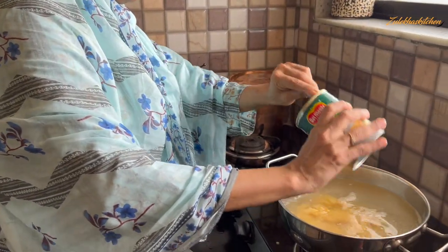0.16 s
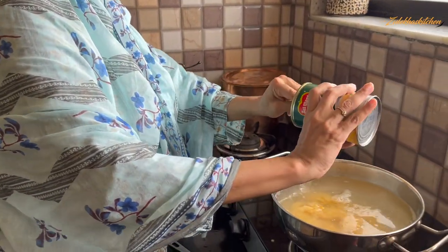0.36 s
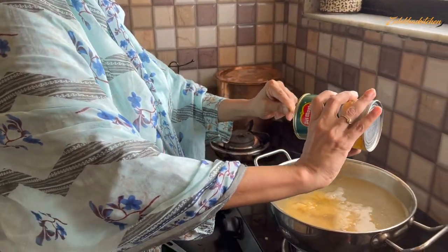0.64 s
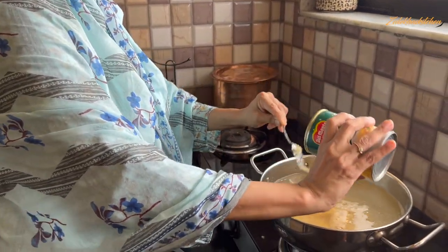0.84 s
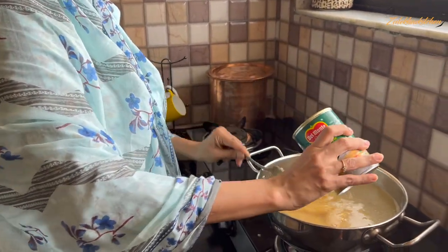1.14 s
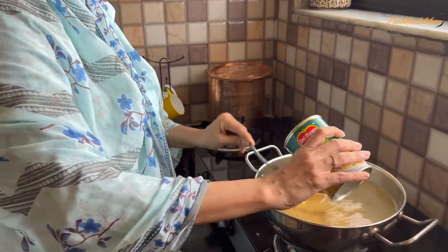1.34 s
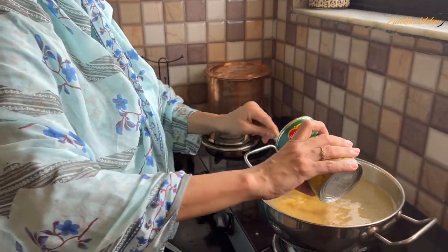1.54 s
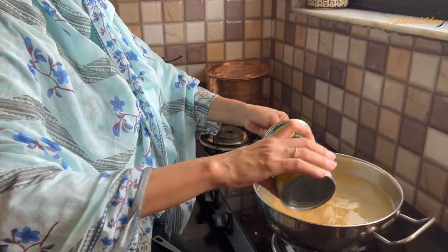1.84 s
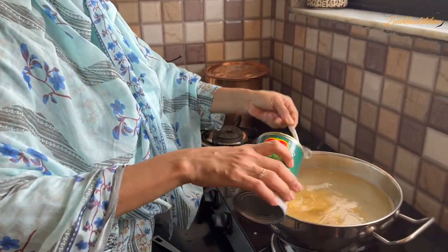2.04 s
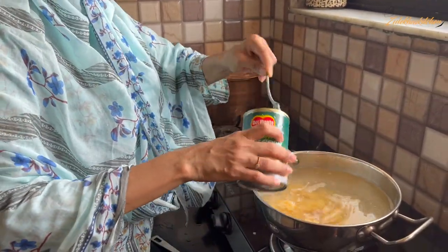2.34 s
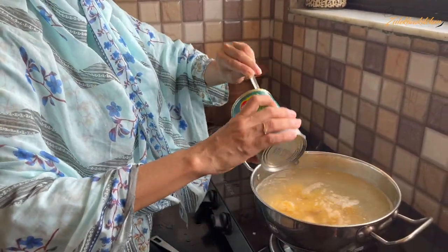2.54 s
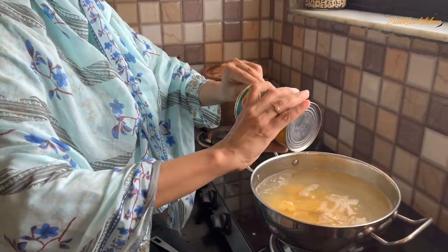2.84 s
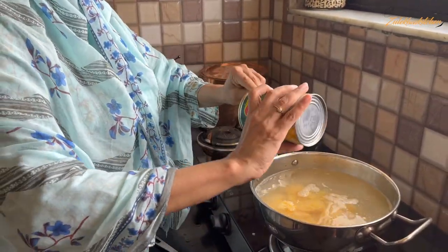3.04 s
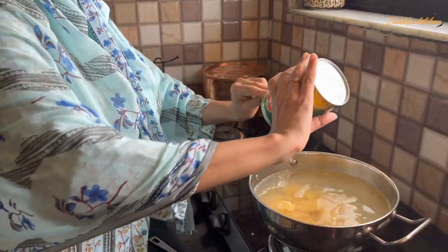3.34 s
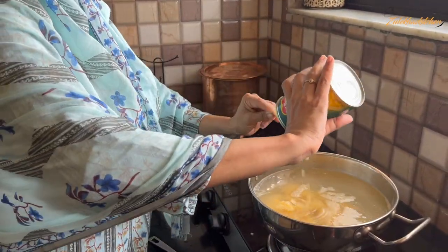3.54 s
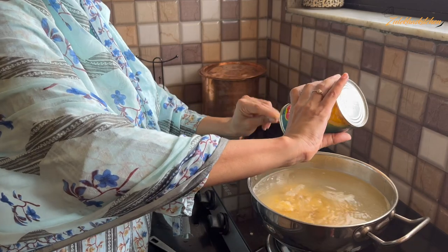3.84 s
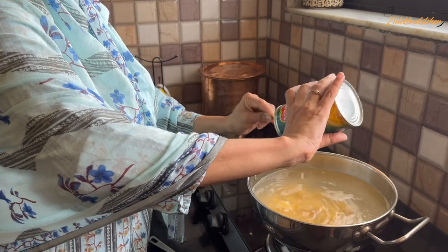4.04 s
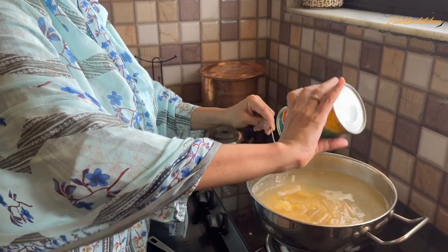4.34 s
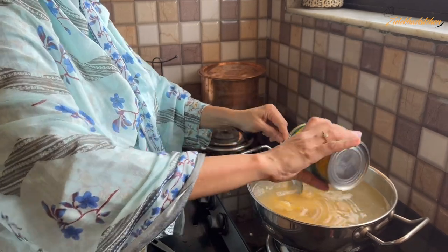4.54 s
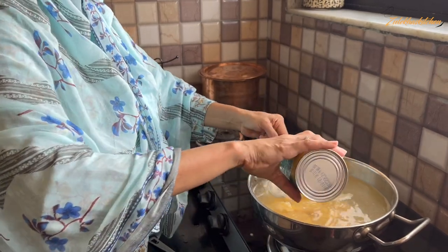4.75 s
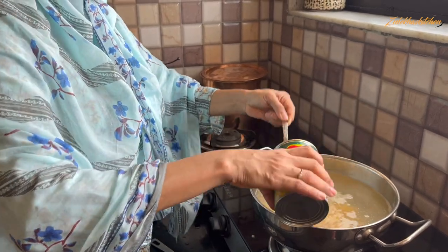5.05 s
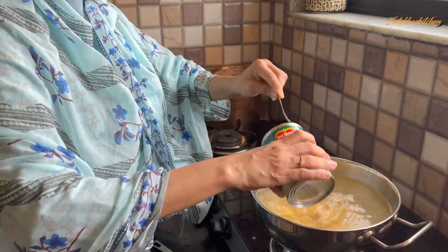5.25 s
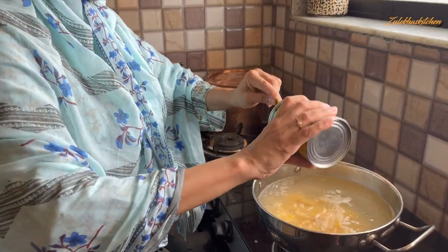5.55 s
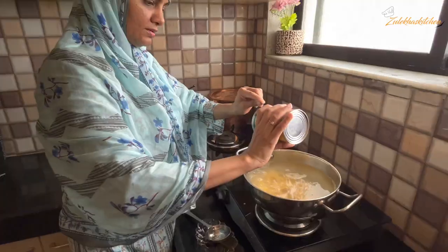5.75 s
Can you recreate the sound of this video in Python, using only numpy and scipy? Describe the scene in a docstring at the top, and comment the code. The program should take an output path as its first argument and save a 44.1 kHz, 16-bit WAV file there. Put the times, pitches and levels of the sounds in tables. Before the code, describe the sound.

A close stereo pickup in a small, hard-tiled kitchen, with a quiet, wavering low hum throughout. From 0 to 0.8 s a steel spoon scrapes a hand-held tin can in short, gritty stick-slip strokes; the hollow booms around 600 Hz, rubbed spots squeal briefly, and damped tinny knocks, ticks and a small spoon ring punctuate them. At about 1.15 s and again at 1.3 s the spoon clatters hard and bright on a steel pot, the loudest moments, ringing for under a second. Near 2.07 s a distant scooter horn gives one nasal, fluttering quarter-second toot. Scraping resumes from 2.4 s, strongest around 3.0 s, continuing unevenly with light knocks until 4.25 s. Two fainter, short toots come at 4.5 and 4.75 s. A tight cluster of dull, hollow knocks falls at 5.1 s, then sparse faint scrapes, with a slightly stronger rasp and knock near 5.75 s.

```python
"""A steel spoon scrapes out a hand-held tin can over a pot in a small tiled kitchen, above a low hum.
From the start, stick-slip friction rasps the wall, sings at each rubbed spot and pumps the hollow;
the spoon knocks, ticks and springs free, each exciting modes or a short burst of noise.
After a second it clatters on the steel pot, whose modes ring on; from two seconds a distant scooter
horn sounds three times as fluttering harmonics, while the scraping resumes and at last thins out."""
import sys
import numpy as np
from scipy import signal
from scipy.fft import rfft, irfft
from scipy.io import wavfile
from scipy.ndimage import uniform_filter1d, map_coordinates

SR = 44100
rng = np.random.default_rng(int(sys.argv[2]) if len(sys.argv) > 2 else 0)


def materialize(psi):
    """Save the field psi as 16-bit PCM at rate SR to the path in sys.argv[1].

    A 1-D psi becomes a single channel; in a 2-D psi each row is a channel.
    """
    bounded = np.clip(np.atleast_2d(psi).T, -1, 1)
    quanta = np.round(bounded * 32767).astype(np.int16)
    wavfile.write(sys.argv[1], SR, quanta)


N = 259749
T = np.arange(N) / SR
HZ = np.maximum(np.fft.rfftfreq(N, 1 / SR), 1)

# Strokes of the spoon. Each row: start in seconds, build-up in seconds, drag in seconds,
# relative rasp level in dB, treble against rasp in dB, relative boom level of the hollow in dB,
# pitch of the hollow in Hz as the spoon shades its mouth, pitch of the rubbed spot in Hz,
# and level of that spot against the rasp in dB (each layer adds its own offset).
STROKES = [ (0.055, 0.027, .025, -35, 0.5, -39.5, 596, 1120, -3.5),
           (0.116, 0.032, .006, -33.5, -1, -43, 634, 1970, 2.5),
           (0.164, 0.0017, .012, -30, 2, -42, 666, 1250, 4),
           (0.192, 0.015, 0.035, -34.5, -0.5, -25, 690, 1440, 4),
           (0.215, 0.012, .028, -37.5, 1, -45.5, 640, 2700, 6),
           (0.286, 0.0074, 0.062, -36.5, -2.5, -23.5, 604, 1740, -2.5),
           (0.43, 0.026, .011, -62.5, 18.5, -33.5, 602.4, 4700, 15),
           (0.466, 0.037, 0.02, -22, -1, -26, 608, 1650, -7),
           (0.506, 0.022, 0.052, -29, 0, -25.5, 600, 1810, -8),
           (0.606, 0.044, 0.051, -56, 4, -33.5, 585.5, 10800, -1),
           (0.748, 0.015, 0.0129, -43, 5, -54.5, 701, 5470, -4),
           (0.771, 0.018, 0.0054, -30.5, 2, -51, 689, 3130, 1.5),
           (2.402, 0.047, 0.062, -44.5, 3, -44, 627, 1680, -3.5),
           (2.584, 0.0227, .02, -51, 6.5, -37.5, 608, 1800, -4),
           (2.625, 0.0051, 0.103, -39.5, 1, -43, 611, 1700, -1.5),
           (2.845, 0.0074, .023, -45, -0.5, -31.5, 643, 1400, 0),
           (2.869, 0.024, 0.047, -33.5, 0, -37, 607, 2140, -14.5),
           (2.975, 0.046, 0.024, -56, 17.5, -31.5, 537, 4900, 5),
           (3.02, 0.035, 0.0659, -28, -1.5, -22.5, 606, 3020, -6.5),
           (3.22, .008, 0.0086, -47, -3.5, -46.5, 598.5, 4720, 5.5),
           (3.302, 0.04, 0.0045, -43.5, 6, -35, 586, 3300, -2),
           (3.43, 0.011, .03, -52, 11, -41, 617.4, 3400, 9.5),
           (3.457, 0.027, .018, -45, 10, -34, 619.5, 5000, -6),
           (3.742, 0.022, .02, -29, -5.5, -30.5, 602, 4630, -0.5),
           (3.752, 0.018, 0.016, -36, -3, -42, 609, 2330, -2),
           (3.79, 0.025, .035, -42, -0.5, -47.5, 618, 3200, 1.5),
           (3.857, 0.0068, .01, -53, 12, -33, 625, 4670, 10),
           (3.952, 0.0172, .01, -59, 6.5, -60.5, 607, 5380, -1),
           (4.076, 0.011, 0.01, -38.5, 4.5, -32.5, 593, 4550, 7.5),
           (4.131, 0.062, 0.032, -49, 6, -30.5, 617, 4590, 7),
           (5.273, 0.023, 0.015, -56, 5.5, -45, 663, 4880, 4),
           (5.354, .014, .016, -60.5, -1, -63, 658, 1100, 14),
           (5.372, 0.018, .022, -61.5, 4, -50.5, 664, 1950, 9),
           (5.479, 0.023, .018, -59.5, 13, -54, 654.3, 5870, 2),
           (5.585, 0.009, .018, -65.5, 2, -58, 602, 6630, -4),
           (5.729, 0.025, .015, -36.5, 3.5, -32.5, 605.4, 1110, -7.5),
           (5.820, .032, 0.026, -45, 7, -51, 636, 1780, -9), ]
# Modes of the undamped can. Each row: frequency in Hz, relative level in dB, t60 in seconds.
CAN_MODES = [(350, -16.5, 0.45), (507, -13, 0.14), (592, 2, 0.64), (640, 7.5, 0.28), (757, -3, 0.63),
             (830, -3.5, 0.4), (1084, -18, 0.17), (1107, -7, 0.44), (1230, -8.5, 0.092),
             (1433, -12.5, 0.34), (1530, -28, 0.09), (1785, -13, 0.16), (1848, -0.5, 0.11),
             (1946, -1, 0.24), (2303, -4, 0.073), (2420, -11, 0.07), (2657, -18.5, 0.1), (2907, -3, 0.098),
             (3260, -16.5, 0.28), (3497, -7.5, 0.15), (4180, -9, 0.25), (4560, -13.5, 0.37),
             (5250, -23, 0.17), (5650, -2, 0.034), (6440, -7.5, 0.08)]
RASP_RELEASE_DB_PER_S = 258  # fall as the spoon lifts


def undb(db):
    """Level law: decibels to amplitude gain."""
    return 10 ** (np.asarray(db) / 20)


def unit(x):
    """Normalization: scale to rms 1."""
    return x / np.sqrt(np.mean(x ** 2))


def shape(x, gain):
    """Linear filtering: multiply the spectrum by a gain for each frequency."""
    return irfft(rfft(x) * gain, N)


def colour(x, points):
    """Spectral envelope: filter by (Hz, dB) points joined on a log-frequency axis."""
    hz, db = np.transpose(points)
    return shape(x, undb(np.interp(np.log(HZ), np.log(hz), db)))


def cut(x, hz, kind, order=2):
    """Causal Butterworth low-pass or high-pass."""
    sections = signal.butter(order, min(hz, .45 * SR), kind, fs=SR, output="sos")
    return signal.sosfilt(sections, x)


def fade(t, t60):
    """Exponential damping: decay by 60 dB in t60 seconds."""
    return np.exp(-np.log(1000) * t / t60)


def walk(per_s):
    """Random modulation of spread near 1: chance values joined by straight lines."""
    return 1.2 * np.interp(T * min(per_s, 160), np.arange(1000), rng.standard_normal(1000))


def ring(modes, length=SR // 2):
    """Modal superposition: (Hz, dB, t60) modes after one tap, from rest and swinging either way."""
    t = T[:length]
    total = np.zeros(length)
    for hz, db, t60 in modes:
        total += rng.choice([-1, 1]) * undb(db) * fade(t, t60) * np.sin(2 * np.pi * hz * t)
    return total


def add(out, s, sound):
    """Superposition: mix a sound in at s seconds."""
    i = int(s * SR)
    out[i:i + len(sound)] += sound[:N - i]


def even(x, span_s):
    """Envelope levelling: hold a vibration near rms 1 over span_s, keeping its faster flutter."""
    size = int(span_s * SR)
    power = uniform_filter1d(uniform_filter1d(x ** 2, size), size)
    return x / np.sqrt(power + 1e-12)


def resonate(x, hz, width_hz):
    """Heterodyne resonance: shift a moving centre to zero, low-pass, and shift back."""
    turn = np.exp(2j * np.pi * np.cumsum(hz) / SR)
    return unit((cut(x * turn.conj(), width_hz / 2, "low") * turn).real)


def hum(level_db=-63.5, side_db=-13, waver_db=8):
    """Diffuse background of house and street: noise nearly alike in both ears, its rumble wavering."""
    # Each row: frequency in Hz, relative level in dB.
    hum_spectrum = [(25, -23.5), (60, -14.5), (130, 4.5), (170, -5.5), (300, -3.5), (500, -8.5), (800, -18),
                    (1300, -13.5), (2100, -25), (4000, -30), (6300, -36.5), (8500, -58), (15000, -50)]
    mid, side = (unit(colour(rng.standard_normal(N), hum_spectrum)) for _ in range(2))
    sound = mid + undb(side_db) * side * np.array([[1], [-1]])
    rumble = shape(sound, 1 / (1 + (HZ / 300) ** 4))
    # tanh keeps the waver within waver_db either way
    wavering = rumble * undb(waver_db * np.tanh(walk(33)))
    return undb(level_db) * (sound - rumble + wavering)


def slips(per_s, spread_db):
    """Stick-slip friction: tiny jerks of uneven size at random moments."""
    size = undb(spread_db * np.clip(rng.standard_normal(N), -2, 2))
    return unit((rng.random(N) < per_s / SR) * size * rng.choice([-1, 1], N))


def rub(force, modes, shift_db, shifts_per_s):
    """Point excitation: the contact wanders over the nodes of each mode, so modes come and go."""
    out = np.zeros(N)
    for hz, db, t60 in modes:
        r, w = fade(1 / SR, t60), 2 * np.pi * hz / SR
        push = force * undb(shift_db * walk(shifts_per_s))
        out += undb(db) * signal.lfilter([1, 0, -1], [1, -2 * r * np.cos(w), r * r], push)
    return unit(out)


def retune(x, share, per_s):
    """Time warping: all resonances of a vibration drift up and down together."""
    return map_coordinates(x, [np.cumsum(1 + share * walk(per_s))], order=3, mode="mirror")


def stroke_gain(start, build_s, drag_s, release_db_per_s):
    """Contact force envelope: the edge bites, drags with easing pressure, and lifts off."""
    bite_db, sag_db_per_s = 28, 55.5
    t = T - start
    bite = bite_db * np.minimum(t / build_s - 1, 0)
    sag = sag_db_per_s * np.clip(t - build_s, 0, drag_s)
    lift = release_db_per_s * np.maximum(t - build_s - drag_s, 0)
    return undb(np.maximum(bite - sag - lift, -200))


def stroking():
    """Energy summation: gains of rasp, treble and boom, and the hollow's power-weighted pitch."""
    treble_release_db_per_s, boom_release_db_per_s = 262.5, 244.5
    # coarse slips set in after the rasp and drag on a little longer
    boom_lag_s, boom_linger_s = 0.012, 0.0017
    rasp, treble, boom, tuning = np.zeros((4, N))
    for s, build_s, drag_s, rasp_db, treble_db, boom_db, hollow_hz, _, _ in STROKES:
        rasp_stroke = stroke_gain(s, build_s, drag_s, RASP_RELEASE_DB_PER_S)
        rasp += (undb(rasp_db) * rasp_stroke) ** 2
        treble_stroke = stroke_gain(s, build_s, drag_s, treble_release_db_per_s)
        treble += (undb(rasp_db + treble_db) * treble_stroke) ** 2
        boom_stroke = stroke_gain(s + boom_lag_s, build_s, drag_s + boom_linger_s, boom_release_db_per_s)
        power = (undb(boom_db) * boom_stroke) ** 2
        boom += power
        tuning += hollow_hz * power
    return np.sqrt(rasp), np.sqrt(treble), np.sqrt(boom), tuning / boom


def rasping_wall(sing_db=1, grain_db=2):
    """Friction-driven plate: fine slips excite a dense rasp and the can's pressed upper modes."""
    # Dense rasp of the ribbed wall. Each row: frequency in Hz, relative level in dB.
    rasp_spectrum = [(100, -38.5), (330, -1), (560, -11.5), (900, -6), (1100, 6), (1330, -10), (1800, 6),
                     (2600, -3.5), (3100, 3), (3900, -2.5), (5000, 6), (7200, -16), (10300, -12),
                     (15500, -15)]
    # the edge catches on the ribs, so the slips come in bunches
    friction = slips(per_s=1500, spread_db=1.5) * undb(grain_db * walk(90))
    # the pressing spoon damps the wall, broadens its modes and retunes them as it travels
    pressed = [(hz, db, 0.29 * t60) for hz, db, t60 in CAN_MODES[6:]]
    modes = rub(friction, pressed, shift_db=9.0, shifts_per_s=16)
    return unit(colour(friction, rasp_spectrum)) + undb(sing_db) * retune(modes, share=.025, per_s=7)


def pumped_hollow(hollow_hz, low_modes_db=-5):
    """Cavity resonance: coarse slips pump the air in the hollow and the can's low modes."""
    judder = slips(per_s=340, spread_db=5.5)
    # the moving spoon and the shifting contents retune the hollow
    moving_hz = hollow_hz * (1 + 0.011 * walk(15))
    air = cut(resonate(judder, moving_hz, width_hz=92.5), 140, "high")
    low_modes = rub(judder, CAN_MODES[:6], shift_db=12.0, shifts_per_s=16)
    low_modes = cut(cut(low_modes, 290, "high"), 620, "low")
    return air + undb(low_modes_db) * low_modes


def scraping(rasp_db=0, boom_db=1, treble_db=-2.5, treble_hz=4000,
             sizzle_db=1, sizzle_growth=0.023, firm_db=-38):
    """Stick-slip excitation: stroke gains drive rasp, treble and hollow. Returns wall and hollow."""
    rasp_gain, treble_gain, boom_gain, hollow_hz = stroking()

    def driven(x, gain, db):
        return undb(db) * even(x, 0.011) * uniform_filter1d(gain, SR // 300)

    wall = rasping_wall()
    treble = shape(wall, 1 / (1 + (treble_hz / HZ) ** 8))
    lower = driven(wall - treble, rasp_gain, rasp_db)
    upper = driven(treble, treble_gain, treble_db)
    hollow = driven(pumped_hollow(hollow_hz), boom_gain, boom_db)
    # the harder the stroke, the sharper its slips, so the top octave grows fastest
    sizzle = shape(upper, 1 / (1 + (8000 / HZ) ** 12))
    force = uniform_filter1d(treble_gain, SR // 100).clip(1e-6) / undb(firm_db)
    sharpness = undb(sizzle_db) * force ** sizzle_growth
    return lower + upper + (sharpness - 1) * sizzle, hollow


def singing(width_hz=190, wander=0.011, wanders_per_s=22, level_db=-1):
    """Local resonance: each stroke rubs another spot, whose tone wanders as the spoon travels."""
    gain, spot_hz = np.zeros((2, N))
    for s, build_s, drag_s, rasp_db, _, _, _, hz, spot_db in STROKES:
        stroke = undb(rasp_db + spot_db) * stroke_gain(s, build_s, drag_s, RASP_RELEASE_DB_PER_S)
        # the strongest stroke sets the pitch
        spot_hz = np.where(stroke > gain, hz, spot_hz)
        gain = np.maximum(gain, stroke)
    moving_hz = spot_hz * (1 + wander * walk(wanders_per_s))
    tone = resonate(slips(per_s=530, spread_db=1.0), moving_hz, width_hz)
    return undb(level_db) * gain * even(tone, 0.021)


def knocking(spot_db=12, spot_octaves=0.2, crack_db=-2, crack_t60=0.067, grip=0.58, detune=0.0054,
             clank_t60=0.23):
    """Impact excitation: the hand-damped can rings, the spoon buzzes against it, the sheet clanks."""
    # Knocks in the can. Each row: time in seconds, relative level in dB, contact cut-off in Hz,
    # frequency favoured by the spot struck in Hz, clank of the sheet against the modes in dB.
    knock_rows = [(0.089, -28.5, 4970, 1130, -24), (0.166, -25.5, 9000, 4597, -10),
                  (0.201, -15.5, 6000, 840, -24), (0.215, -21, 4000, 1427, -20),
                  (0.232, -26, 1437, 820, -28), (0.256, -30, 1190, 656, -26.5),
                  (0.297, -23, 6550, 685, -29), (0.328, -26, 910, 606, -27), (0.79, -41, 8500, 1110, -8.5),
                  (2.639, -36, 6000, 697, -21), (2.851, -33.5, 4950, 706, -2), (3.063, -31, 5000, 536, -9),
                  (3.1, -36, 1200, 614, -16), (3.226, -39, 2000, 990, -5), (3.438, -43.5, 9000, 2330, -35),
                  (3.54, -34, 820, 586, -20), (3.779, -31, 2500, 586, -14), (3.867, -36, 7950, 705, -26),
                  (3.998, -36.5, 860, 637, -33.5), (4.088, -40.5, 9000, 4250, -21),
                  (4.205, -32.5, 1190, 693, -22), (4.252, -48, 890, 589, -24),
                  (5.1038, -37, 7500, 4200, 12), (5.109, -26, 700, 468, -1.5), (5.122, -27, 870, 1180, -2),
                  (5.137, -25, 910, 640, -6.5), (5.364, -52.5, 1440, 1110, 1), (5.769, -33, 1500, 614, -19)]
    # Clank of the thin sheet, a crowd of short modes. Each row: frequency in Hz, relative level in dB.
    clank_spectrum = [(40, -57), (200, -15), (350, 2), (450, -2.5), (700, 7.5), (950, 1), (1300, 4.5),
                      (1780, -19), (2350, -2), (3000, -11), (3800, -20), (4250, 0), (4600, -12),
                      (5100, -23), (6300, -20.5), (9000, -41.5), (15000, -36.5)]
    out, length = np.zeros(N), SR // 2
    t = T[:length]
    sheet = unit(colour(rng.standard_normal(N), clank_spectrum))
    for s, db, contact_hz, spot_hz, clank_db in knock_rows:
        modes = []
        for hz, level, t60 in CAN_MODES:
            favour = spot_db * np.exp(-(np.log2(hz / spot_hz) / spot_octaves) ** 2)
            # the hand retunes and damps each mode
            modes.append((hz * (1 + detune * rng.standard_normal()), level + favour, t60 * grip))
        tone = ring(modes)
        tone /= np.std(tone[:SR // 50])
        # the buzz passes through the same modes, heavily damped
        buzz = unit(signal.fftconvolve(rng.standard_normal(length), tone * fade(t, 0.029))[:length])
        blow = cut(tone + undb(crack_db) * buzz * fade(t, crack_t60), 420, "high", order=4)
        clank = cut(np.roll(sheet, rng.integers(N))[:length] * fade(t, clank_t60), 240, "high")
        add(out, s, undb(db) * cut(blow + undb(clank_db) * clank, contact_hz, "low"))
    return out


def ticking(tick_t60=0.11):
    """Sudden release: the edge snaps off a rib in a short burst of band-limited noise."""
    # Each row: time in seconds, relative level in dB, centre in Hz, width in octaves.
    tick_rows = [(0.167, -32, 3960, 1.7), (0.297, -35, 5200, 0.77), (2.641, -41, 5000, 1),
                 (0.501, -37, 11000, 1.5), (1.97, -45, 4300, 0.077), (2.431, -42, 2870, .06),
                 (2.85, -53, 10500, .7), (3.049, -35.5, 11000, 0.76), (3.226, -38, 1025, 0.19),
                 (3.322, -36, 4750, 0.15), (3.438, -47, 5000, 2.4), (3.864, -42, 7400, 2),
                 (3.977, -49, 9700, 1.3), (4.079, -55, 8000, 1.3), (5.107, -35.5, 4500, .08),
                 (5.286, -62, 5500, .8), (5.392, -54, 3550, .12), (5.468, -57, 6040, 1.8)]
    out = np.zeros(N)
    for s, db, hz, octaves in tick_rows:
        band = 1 / (1 + (2 * np.log2(HZ / hz) / octaves) ** 2)
        burst = unit(shape(rng.standard_normal(N), band))
        add(out, s, undb(db) * burst[:SR // 5] * fade(T[:SR // 5], tick_t60))
    return out


def spoon_ring():
    """Free vibration: the spoon springs off the wall and rings, each time with another modal blend."""
    # Each row: time in seconds, relative level in dB, frequency favoured by the way it lets go in Hz,
    # that favour in dB, t60 of the extra damping by the fingers in seconds.
    release_rows = [(0.311, -44, 3278, 12, 3), (0.793, -35.5, 4450, 3, .6)]
    # Each row: frequency in Hz, relative level in dB, t60 without the fingers in seconds.
    spoon_modes = [(2369, -6, .26), (3040, -2, .26), (3144, -2, .3), (3278, -2, .29), (4377, -1, .3),
                   (4520, -2, .33), (4700, -4, .28), (5216, -5, .25), (5560, -4, .25)]
    out, favour_width_hz = np.zeros(N), 70
    for s, db, best_hz, favour_db, finger_t60 in release_rows:
        modes = []
        for hz, level, t60 in spoon_modes:
            favour = favour_db * np.exp(-((hz - best_hz) / favour_width_hz) ** 2)
            modes.append((hz, level + favour, t60))
        add(out, s, undb(db) * ring(modes) * fade(T[:SR // 2], finger_t60))
    return out


def clattering(chatter_s=0.0063, steel_t60=0.52, level_db=-3, pot_modes_db=-10.5):
    """Repeated impact: a quick swell of contacts convolves with the steel's ringing response."""
    # Each row: time in seconds, relative level in dB, time constant of the build-up in seconds,
    # bass cut in Hz, t60 of the extra damping by the hand in seconds.
    clatter_rows = [(1.118, -40, 0.0008, 1800, 0.02), (1.146, -18, 0.0052, 997, 2.66),
                    (1.168, -18, 0.0082, 480, 0.31), (1.297, -16.5, 0.01, 1365, 0.84),
                    (1.325, -25.5, 0.005, 272, 0.2), (1.973, -62, 0.00032, 3840, 0.093)]
    # Modes of the pot. Each row: frequency in Hz, relative level in dB, t60 without the hand in seconds.
    pot_modes = [(1430, -4, .18), (2025, -6, .2), (2245, 1, .4), (2338, -7, .28), (2505, -4, .22),
                 (2796, -1, .25), (3047, -12, .23), (3381, -13, .29), (4135, 1, .68), (4173, 0, .6),
                 (4280, -6, .3), (4447, -2, .3), (4878, -7, .35), (5400, -9, .35), (5835, -9, .2),
                 (6400, -9, .27), (7176, -9, .4)]
    # Crowd of fainter steel modes. Each row: frequency in Hz, relative level in dB.
    steel_spectrum = [(100, -16), (300, 7), (520, 5), (750, 2.5), (1100, -4.5), (1500, -1), (2200, 4),
                      (3100, -2.5), (4400, 4), (5600, -2.5), (7300, 0.5), (8800, -13), (9900, -10),
                      (11500, -13), (15500, -23.5)]
    out, length = np.zeros(N), SR * 2 // 3
    t = T[:length]
    crowd = colour(rng.standard_normal(N), steel_spectrum)
    modes = unit(ring(pot_modes, length))
    contacts = slips(per_s=4000, spread_db=0.0)
    for s, db, build_s, bass_hz, hand_t60 in clatter_rows:
        # each clatter meets another spot of the crowd
        spot = unit(np.roll(crowd, rng.integers(N))[:length] * fade(t, steel_t60))
        steel = (spot + undb(pot_modes_db) * modes) * fade(t, hand_t60)
        press = np.exp(-np.abs(T - s) / np.where(T < s, build_s, chatter_s))
        sound = cut(signal.fftconvolve(contacts * press, steel)[:N], bass_hz, "high")
        peak_rms = np.sqrt(uniform_filter1d(sound ** 2, SR // 50).max())
        out += undb(db + level_db) * sound / peak_rms
    return out


def toot_gain(start, length_s):
    """Amplitude envelope: a toot starts quickly, swells to a crest, eases and dies away."""
    attack_s, release_db_per_s = 0.0038, 424
    swell_db, crest = 13.5, 0.72  # the crest comes at this share of the length
    t = T - start
    swell = swell_db * np.abs(np.clip(t / length_s, 0, 1) / crest - 1)
    release = release_db_per_s * np.maximum(t - length_s, 0)
    return np.clip(t / attack_s, 0, 1) * undb(-swell - release)


def horn(level_db=-4.0, waver_db=5.0, carry_db=6, carry_hz=300, smear=.3, scatter_share=.75):
    """Multipath propagation: a far diaphragm's harmonics flutter over the street's shifting paths."""
    # Each row: start in seconds, length in seconds, relative level in dB, pitch in Hz,
    # frequency that carries best down the street in Hz, relative level of the echoes in dB,
    # blur of the lines in Hz.
    toot_rows = [(2.068, 0.26, -38.5, 407.7, 3230, -6.5, 14), (4.535, 0.062, -53, 395.7, 2704, 1, 44),
                 (4.739, 0.13, -48, 394.5, 3160, 2, 39)]
    # Each row: multiple of the pitch, relative level in dB.
    harmonics = [(1, -11.5), (6, -38), (7, -1.5), (8, -2), (9, -17.5), (13, -35), (16, -34), (22, -24),
                 (23, -32)]
    # Echoes down the street. Each row: delay in seconds, relative level in dB.
    street_echoes = [(.125, -11.5), (0.216, -19.5)]
    out = np.zeros((2, N))
    for s, length_s, toot_db, hz, best_hz, echo_db, blur_hz in toot_rows:
        power = toot_gain(s, length_s) ** 2
        for delay, db in street_echoes:
            power = power + (undb(echo_db + db) * toot_gain(s + delay, length_s)) ** 2
        gain = undb(toot_db) * np.sqrt(power)
        on = (T >= s) & (T < s + 1)
        for multiple, db in harmonics:
            line_hz = round(multiple) * hz
            carried = carry_db * (np.exp(-((line_hz - best_hz) / carry_hz) ** 2) - .5)
            phase = 2 * np.pi * line_hz * T[on] + smear * walk(54)[on]
            # a scattered part, different in each ear, blurs the line
            blur = cut(rng.standard_normal((2, on.sum())), blur_hz, "low", order=1)
            line = np.sin(phase) + scatter_share * unit(blur) * np.cos(phase)
            out[:, on] += gain[on] * undb(level_db + db + carried + waver_db * walk(40)[on]) * line
    return out


def kitchen(x, wet_db, early_t60, moves_per_s, late_t60=0.071, late_db=-22):
    """Reverberation: close tiles and a duller room tail answer; paths shift as the hands move."""
    length, dull_hz = SR // 3, 6900
    t = T[:length]
    # four echo paths into two ears
    early, late = rng.standard_normal((2, 4, 2, length))
    tail = undb(late_db) * cut(late, dull_hz, "low") * fade(t, late_t60)
    echoes = early * fade(t, early_t60) + tail
    echoes /= np.sqrt(np.sum(echoes ** 2, axis=2, keepdims=True))
    paths = np.array([walk(moves_per_s) for _ in echoes])
    paths /= np.sqrt(np.sum(paths ** 2, axis=0))
    wet = signal.oaconvolve((x * paths)[:, None], echoes, axes=2).sum(axis=0)[:, :N]
    return (x + undb(wet_db) * wet) / np.sqrt(1 + undb(wet_db) ** 2)


def scene(boom_pan_db=-2, catch_db=2.0, catches_per_s=150):
    """Direct and reflected sound: the can faces away, so its rasp comes mostly off the tiles."""
    rasp, hollow = scraping()
    # the edge catches and lets go, which makes the rasp gritty
    grit = unit(undb(catch_db * walk(catches_per_s)))
    rasp = (rasp + singing()) * grit + ticking()
    rasp = kitchen(rasp, wet_db=5, early_t60=.028, moves_per_s=12, late_t60=.2, late_db=-13)
    hollow = kitchen(hollow, wet_db=-2.5, early_t60=0.14, moves_per_s=5)
    # a negative pan leans the boom to the right
    hollow = hollow * undb(boom_pan_db * np.array([[.5], [-.5]]))
    knocks = kitchen(knocking() + spoon_ring(), wet_db=1.5, early_t60=0.15, moves_per_s=6.6)
    pot = kitchen(clattering(), wet_db=5, early_t60=.04, moves_per_s=14, late_t60=.35, late_db=-19)
    return hum() + rasp + hollow + knocks + pot + horn()


def record(dry):
    """Interchannel coherence: both ports share the treble, turned in phase; the very top is cut."""
    # Phase between the two microphone ports. Each row: frequency in Hz, phase in radians.
    port_phase = [(6800, .8), (7700, 2.2), (8150, 3.12), (8900, 3.14), (9200, 1.3), (10200, .4),
                  (13200, .5), (14300, 1.9), (15000, 3.0)]
    top_hz = 15550
    left, right = rfft(dry)
    alike = 1 / (1 + (7000 / HZ) ** 40)
    turned = left * np.exp(-1j * np.interp(HZ, *np.transpose(port_phase)))
    right = np.sqrt(1 - alike ** 2) * right + alike * turned
    top_cut = signal.ellip(10, .2, 80, top_hz, fs=SR, output="sos")
    return signal.sosfilt(top_cut, irfft(np.array([left, right]), N))


dry = scene()
out = record(dry)
materialize(out)
```